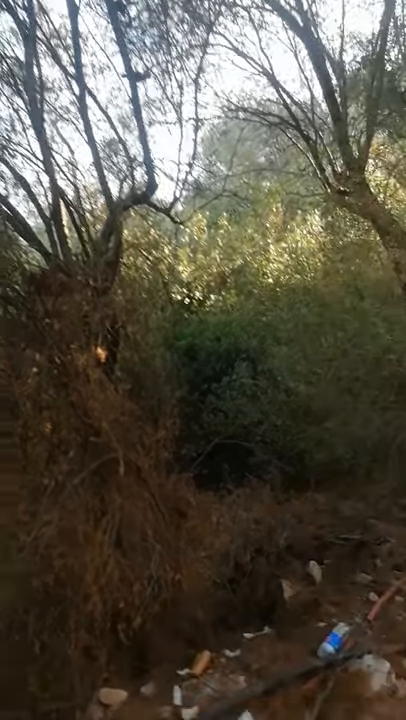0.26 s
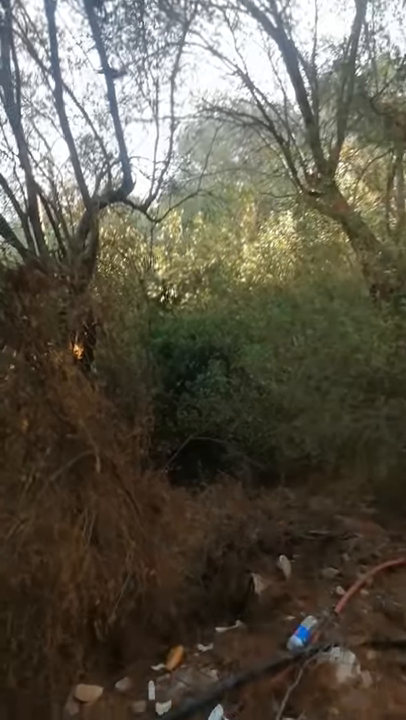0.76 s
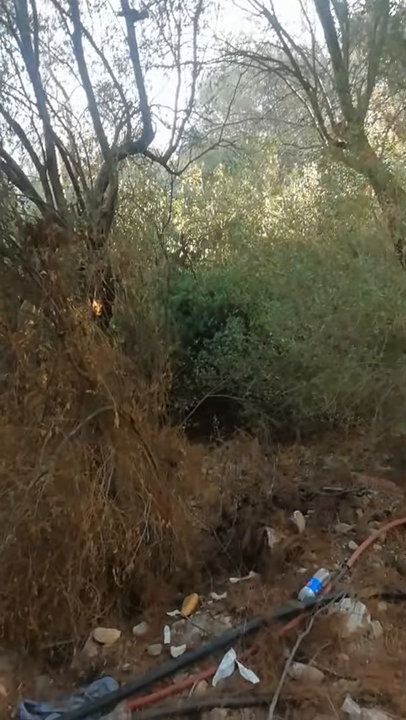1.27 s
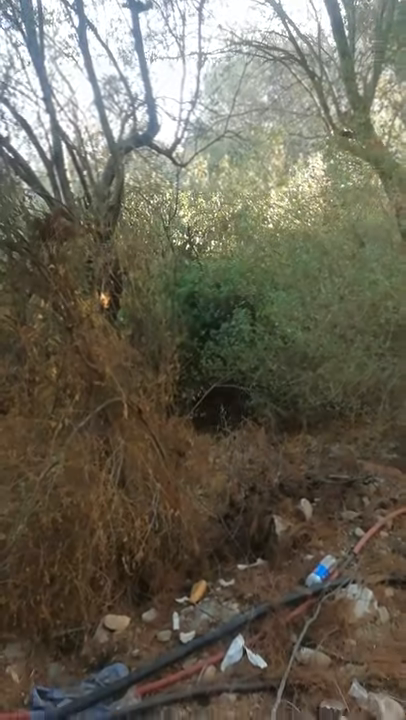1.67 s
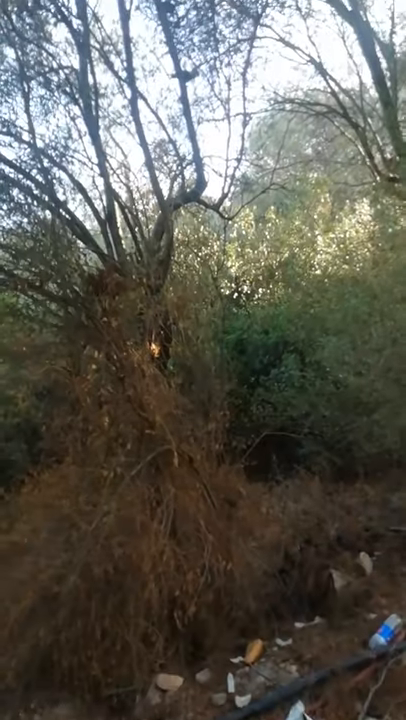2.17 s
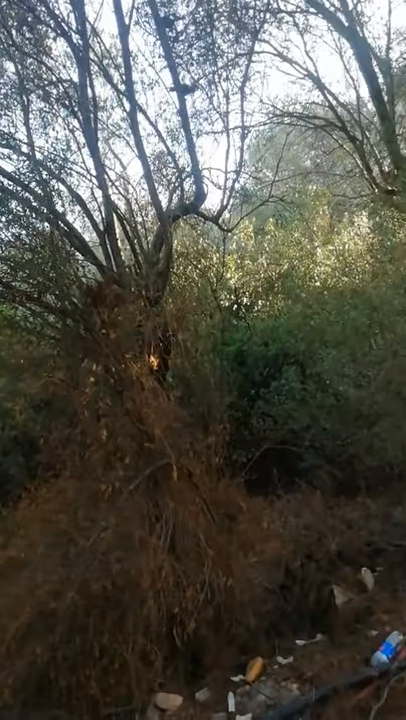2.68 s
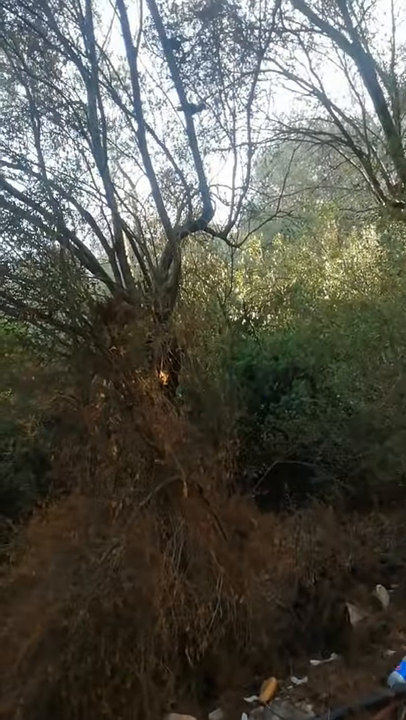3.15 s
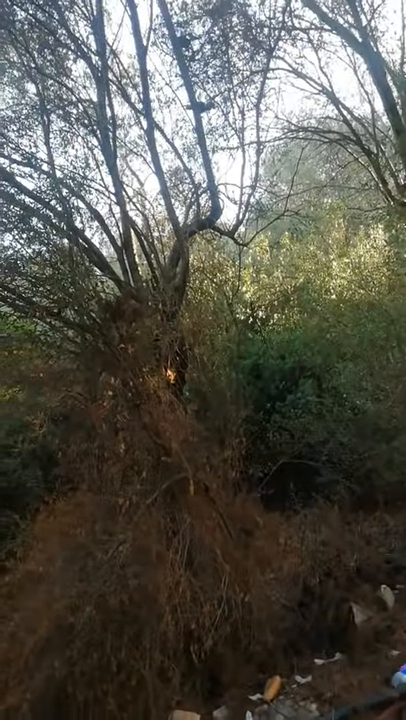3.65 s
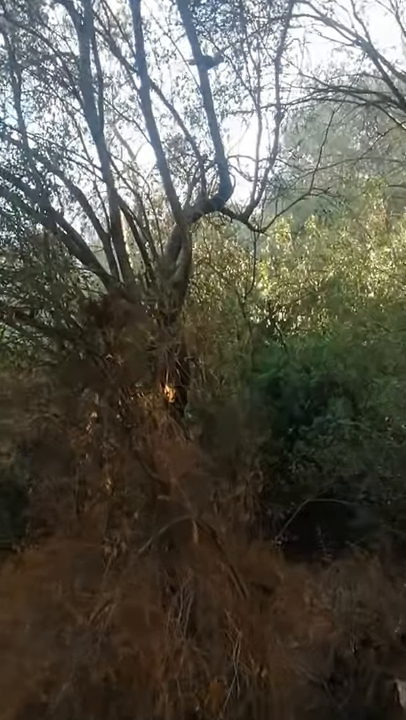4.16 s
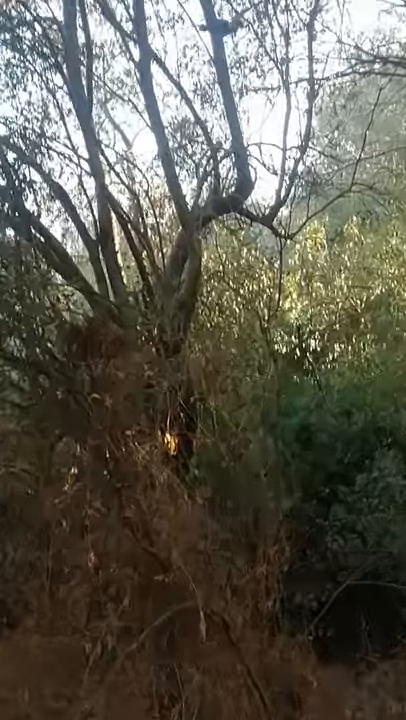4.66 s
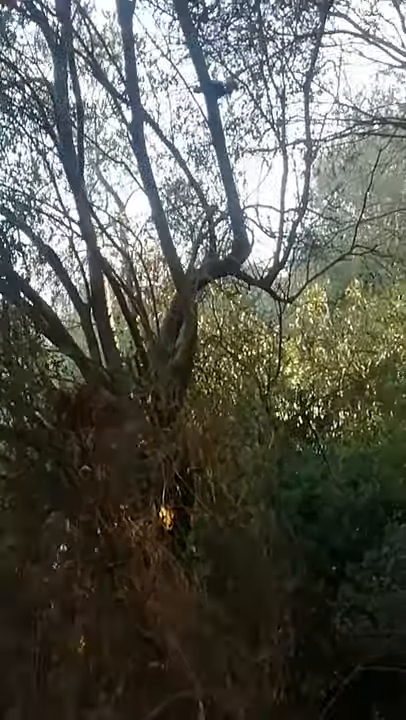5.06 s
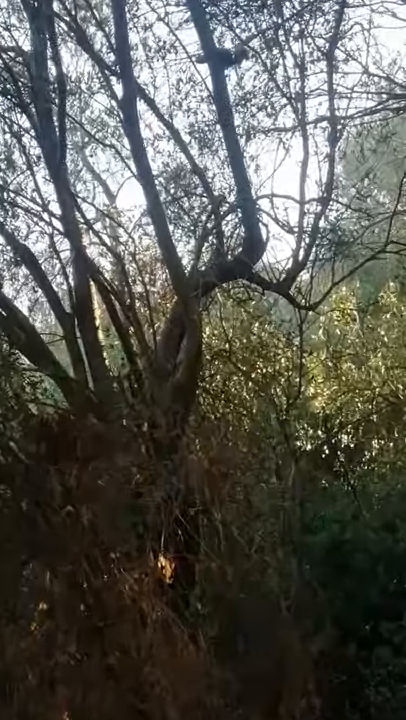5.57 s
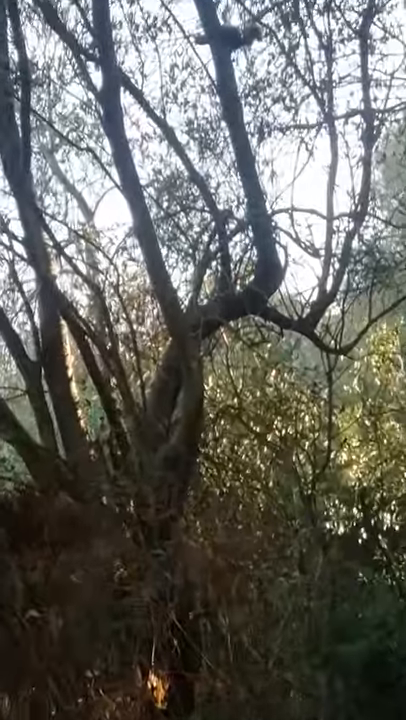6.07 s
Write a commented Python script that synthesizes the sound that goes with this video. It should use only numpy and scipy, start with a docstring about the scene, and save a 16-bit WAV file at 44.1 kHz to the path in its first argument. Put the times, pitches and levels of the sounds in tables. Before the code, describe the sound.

A squirrel scolds from a tree in three quick runs of raspy, squeaky chips, with early finger bumps and faint distant traffic.

```python
"""In the woods, a squirrel scolds from a tree in three quick runs. Most calls open with a hiss, rasp
upward and clear into an arched squeal: harmonics of a moving pitch, echoed by twigs and trunks.
One harsh call ends by jumping up into a clear squeal. A finger bumps, taps and rubs the hand-held
camera, whose right microphone port is muffled. Coloured noise makes the distant traffic and a
passing rush, and a wavering sine makes a far whine."""
import sys
import numpy as np
from scipy import signal
from scipy.fft import rfft, irfft, next_fast_len
from scipy.io import wavfile
from scipy.ndimage import map_coordinates

SR = 44100
rng = np.random.default_rng(int(sys.argv[2]) if len(sys.argv) > 2 else 0)


def wav_out(sig):
    """Save sig, one row per channel (or a flat mono array), as 16-bit PCM at SR to the path in sys.argv[1]."""
    wavfile.write(sys.argv[1], SR, np.round(np.clip(np.atleast_2d(sig).T, -1, 1) * 32767).astype(np.int16))


N = 279153
TIME = np.arange(N) / SR  # seconds

# The squirrel's calls; the row at 2.187 is the end of the harsh call before it, jumping up into a
# clear squeal with almost no hiss or rasp: voice_start_s, length_s, top_pitch_hz, rasp_db, squeal_db,
# doubling (0-1, how unequal alternate voice cycles are)
CALLS = [(0.388, 0.073, 2222, -36.5, -35, 0), (0.6, 0.044, 2275, -29.5, -34, 0),
         (0.785, 0.046, 2240, -32.5, -35, 0.1), (0.978, 0.039, 2194, -35.5, -38, 0.2),
         (2.119, 0.078, 2044, -33, -29.5, 0.95), (2.187, 0.0201, 2340, -58, -33, 0.1),
         (2.266, 0.036, 2375, -26.5, -30.5, 0.03), (2.415, 0.042, 2345, -28.5, -28.5, 0.08),
         (2.589, 0.04, 2222, -31.5, -35.5, 0.1), (2.775, 0.048, 2188, -33.5, -36, 0),
         (2.962, 0.038, 2208, -34.5, -37, 0), (3.168, 0.056, 2174, -42.5, -37.5, 0.13),
         (3.983, 0.064, 2292, -38, -31, 0.06), (4.19, 0.042, 2201, -29, -36, 0),
         (4.371, 0.042, 2190, -34.5, -37, 0.17), (4.548, 0.044, 2193, -33.5, -37, 0),
         (4.725, 0.038, 2178, -34.5, -37, 0.06), (4.918, 0.041, 2062, -41.5, -41, 0.07),
         (5.122, 0.043, 2170, -42, -37.5, 0.22), (5.318, 0.038, 2122, -39, -39, 0.2),
         (5.505, 0.035, 2124, -39, -40.5, 0.1), (5.689, 0.034, 2130, -38, -40, 0.04),
         (5.885, 0.042, 2040, -41, -39.5, 0), (6.079, 0.036, 2000, -43, -40.5, 0.15),
         (6.277, 0.046, 2058, -43, -39, 0.1)]
# Hisses without a voice: start_s, length_s, level_db
VOICELESS_HISSES = [(0.21, 0.034, -53), (1.215, 0.019, -55)]
# Colour of air through the teeth: frequency_hz, density_db (per Hz)
TEETH_COLOUR = [(1200, -36), (2600, -3.5), (5200, -18.5), (7600, 0), (9200, -2.5), (10500, -11.5),
                (12000, -8.5), (15500, -29)]
# Colour of the voice before its resonances: frequency_hz, level_db
FOLDS_COLOUR = [(600, -79), (1300, -2.5), (1800, -19.5), (2400, -3), (3050, -8.5), (3700, -6), (4800, -17),
                (5450, -14.5), (6100, -14), (6700, -12), (8100, -9.5), (9000, -15), (10500, -15.5),
                (12500, -24), (15500, -38)]
# Resonances of chest, throat and mouth: centre_hz, width_hz, boost_db
TRACT_PEAKS = [(2240, 350, -0.5), (4400, 370, 10.5), (7050, 1004, 19)]
# How slowly the echo of the woods dies: frequency_hz, time_to_fall_60_db_s
WOODS_DECAY = [(1000, 0.56), (4300, 0.34), (6800, 0.29), (9000, 0.29), (14000, 0.26)]
# Resonances of the camera body under a finger: centre_hz, width_hz, relative_level_db
CASE_PEAKS = [(516, 107, 32), (885, 160, 12)]
# Soft bumps: start_s, level_db, first_pitch_hz, last_pitch_hz, swell_s
BUMPS = [(0.151, -36.5, 60, 40, 0.0072), (0.2762, -22, 236, 48, 0.014), (3.512, -40, 190, 40, 0.009)]
# Taps: start_s, knock_db (before a shared lift), dull_push_share, left_tick_db, right_tick_db
TAPS = [(0.321, -68, 0, -33, -54), (0.3621, -38.5, 0.97, -41, -31), (3.5135, -36, 0.98, -58, -70)]
# A finger sliding over the case: start_s, length_s, level_db
RUBS = [(0.468, 0.037, -50.5), (0.582, 0.15, -50)]
# Colour of a finger's friction: frequency_hz, density_db (per Hz)
SKIN_COLOUR = [(200, -9), (600, 1.5), (1000, 2), (1500, -8), (3000, -11)]
# Colours of the far road's rumble, roar and tyre wash: frequency_hz, density_db (per Hz)
RUMBLE_COLOUR = [(15, -10.5), (35, -2.5), (52, 0.5), (70, -3.5), (84, -1.5), (102, -9.5), (160, -22.5),
                 (400, -66)]
ROAD_COLOUR = [(80, -16), (150, -4.5), (260, 2), (380, -4), (520, -10), (750, -8.5), (1500, -38)]
TYRE_COLOUR = [(400, -49), (750, 2), (1000, 6), (1500, 5), (2100, 1), (3000, -4.5), (5200, -11.5),
               (7800, -9.5), (10000, -29), (15000, -46)]
# Loudness of those three layers over time: time_s, level_db (before each layer's lift)
RUMBLE_LEVEL = [(0.0, -57), (0.44, -53), (1.16, -62.5), (2.01, -57), (2.96, -61), (3.47, -62), (4.14, -64),
                (4.67, -58), (5.15, -57), (5.87, -64.5), (6.15, -61.5), (6.33, -57)]
ROAD_LEVEL = [(0.0, -61.5), (0.42, -59), (1.89, -63.5), (2.55, -59.5), (3.05, -66.5), (4.76, -62.5),
              (5.18, -58.5), (5.45, -62), (6.33, -62.5)]
TYRE_LEVEL = [(0.0, -60), (0.6, -60.5), (0.92, -63.5), (1.45, -60.5), (1.64, -63.5), (2.48, -65),
              (3.37, -69.5), (4.8, -67), (5.09, -65), (6.33, -69)]
# Colour of the hollow rush of something passing: frequency_hz, density_db (per Hz)
RUSH_COLOUR = [(250, -28), (420, 6), (600, -2), (820, 7.5), (1300, -5.5), (2500, -28)]
# Swells of a far whine: start_s, length_s, level_db
WHINES = [(4.54, 1.3, -65.5), (4.71, 0.2, -58.5), (5.07, 0.087, -54.5)]
# What the muffled right port lets through: frequency_hz, gain_db
MUFFLE = [(200, 1.5), (380, -1.5), (700, -7.5), (1290, -12.5), (2380, -18.5), (4400, -23), (8100, -30),
          (15000, -29)]

RASP_SHARE = 0.4  # of a row's length, before it clears
EASY_DB, FORCED_DB = -48, -30  # rasp level of an effortless and of a fully forced call
# The opening hiss of a typical call; a stronger rasp has a louder, shorter hiss
TYPICAL_RASP_DB, HISS_DB, HISS_LEAD_S = -35, -47.5, 0.024
HISS_DB_PER_DB, LEAD_S_PER_DB = 0.6, 0.0009
# Pitch arch: how far below the top it starts and ends (shares), its bends (powers), last drop's time
CLIMB, FALL, CLIMB_BEND, FALL_BEND, FALL_S = 0.35, 0.085, 2.3, 2.3, 0.015
# A fully forced rasp: scatter of its cycles and share of air; depth and rate of its sputter
SCATTER, AIR, SPUTTER_DB, SPUTTER_HZ = 0.04, 0.54, 6, 401
# A squeal softer than SOFT_DB, or with doubled periods, is rounder: partials around LOW_HZ stand out
SOFT_DB, ROUND_DB_PER_DB, DOUBLED_ROUND_DB = -35.5, 2, 3.5
LOW_HZ, LOW_WIDTH_HZ = 2780, 630
# Something passing: nearest moment, half the time it stays near, levels of its rush and rumble
PASS_S, PASS_WIDTH_S, PASS_RUSH_DB, PASS_RUMBLE_DB = 5.18, 0.21, -54.5, -57
WHINE_HZ = 818
PORT_LAG = 26  # samples by which outdoor sound reaches the right port later
TOUCH_LEAD = 33  # samples by which a touch reaches the right port earlier
TOP_HZ = 15750  # nothing passes above this


def squirrel():
    """All the calls with their twig echoes, and two hisses that find no voice."""
    out = noise(TEETH_COLOUR) * spells(VOICELESS_HISSES, rise=0.0037, fall=0.013)
    for row in CALLS:
        start, sound = call(*row)
        add(out, start, twigs(sound, echo_db=-16.5))
    return out


def call(onset, length, top_hz, rasp_db, squeal_db, doubling):
    """One row: hiss, folds flapping as the pitch climbs, a clear arch; gives start time and sound."""
    size = SR // 6
    excess_db = rasp_db - TYPICAL_RASP_DB
    hiss_at = onset - HISS_LEAD_S + LEAD_S_PER_DB * excess_db
    squeal_at, end = onset + RASP_SHARE * length, onset + length
    t = hiss_at + (np.arange(size) - SR // 100) / SR
    colour = tract(squeal_db, doubling)
    pitch = top_hz * arch(t - onset, length)

    # the harder the call is forced, the more the cycles scatter and sputter and the more air escapes
    force = np.clip((rasp_db - EASY_DB) / (FORCED_DB - EASY_DB), 0.1, 1)
    scatter = SCATTER * force * (wobble(1805, size) + 0.886 * wobble(350.9, size))
    # the flapping folds favour the even harmonics
    flap = unit(voice(pitch * (1 + scatter), 0.56 * force, colour, odd=0.83))
    sputter = amp(SPUTTER_DB * force * np.tanh(wobble(SPUTTER_HZ, size)))
    rasp = (flap + AIR * force * noise(colour, size)) * sputter
    rasp = rasp / np.std(rasp[(t > onset) & (t < squeal_at)])

    fast_jitter = (0.005 + 0.007 * force) * wobble(2000, size)
    slow_jitter = (0.005 + 0.010 * force) * wobble(280, size)
    squeal = voice(pitch * (1 + fast_jitter + slow_jitter), doubling, colour)
    squeal = squeal / np.std(squeal[(t > squeal_at) & (t < end)])
    squeal = squeal * amp(1.78 * wobble(156.7, size))
    squeal = squeal + 0.33 * force * noise(colour, size)

    hiss = noise(TEETH_COLOUR, size) * amp(2.5 * wobble(300, size))
    hiss = hiss * amp(HISS_DB + HISS_DB_PER_DB * excess_db)
    # the three parts overlap a little as one hands over to the next
    sound = hiss * gate(t, hiss_at + 0.0047, onset + 0.014, rise=0.0051, fall=0.011)
    sound = sound + amp(rasp_db) * rasp * gate(t, onset + 0.0017, squeal_at, rise=0.0037, fall=0.003)
    sound = sound + amp(squeal_db) * squeal * gate(t, squeal_at, end - 0.001, rise=0.0061, fall=0.0034)
    return t[0], sound


def voice(pitch, doubling, colour, odd=1):
    """Harmonics through the tract; unequal alternate cycles add lines halfway between them."""
    k = np.arange(1, 15)[:, None] / 2  # harmonic numbers in half steps
    phase = 2 * np.pi * np.cumsum(pitch) / SR
    share = np.where(k % 1, doubling, np.where(k % 2, odd, 1))
    audible = k * pitch < SR / 2
    weight = amp(along(colour, k * pitch)) * share * audible
    first_phase = rng.uniform(0, 2 * np.pi, k.shape)
    return np.sum(weight * np.sin(k * phase + first_phase), axis=0)


def arch(age, length):
    """Pitch as a share of its top: a fast climb, a round crest and a short drop as the call runs out."""
    crest = max(length - FALL_S, length / 2)
    before = np.clip((crest - age) / crest, 0, 1.05)
    after = np.maximum((age - crest) / (length - crest), 0)
    return 1 - CLIMB * before ** CLIMB_BEND - np.minimum(FALL * after ** FALL_BEND, 0.35)


def tract(squeal_db, doubling):
    """(Hz, dB) colour of one call: the folds' slope, three resonances and a broad lift of low partials."""
    hz = np.geomspace(500, 16000, num=120)
    round_db = ROUND_DB_PER_DB * max(SOFT_DB - squeal_db, 0) + DOUBLED_ROUND_DB * doubling
    peaks = [*TRACT_PEAKS, (LOW_HZ, LOW_WIDTH_HZ, round_db)]
    boost_db = sum(db * np.exp(-0.5 * ((hz - centre) / width) ** 2) for centre, width, db in peaks)
    return np.transpose([hz, along(FOLDS_COLOUR, hz) + boost_db])


def twigs(x, echo_db):
    """Nearby branches send back weak copies that strengthen some partials and weaken others."""
    delay = np.round(rng.uniform(0.0004, 0.014, size=8) * SR).astype(int)
    echoes = np.bincount(delay, amp(echo_db) * rng.choice([-1, 1], size=8))
    echoes[0] = 1  # the direct sound
    return signal.fftconvolve(x, echoes / np.linalg.norm(echoes))


def woods(x, wet_db):
    """Trunks and leaves scatter a thin tail, different at each port, its treble dying fastest."""
    hz, t, z = signal.stft(rng.standard_normal((2, SR // 2)), SR, nperseg=256)
    decay = amp(-60 * t / along(WOODS_DECAY, hz)[:, None])
    tail = signal.istft(z * decay, SR, nperseg=256)[1]
    tail = tail * (1 - np.exp(-np.arange(tail.shape[1]) / SR / 0.0041))  # the tail builds up softly
    tail = tail / np.linalg.norm(tail[0])
    return x + amp(wet_db) * signal.fftconvolve(x[None], tail, axes=1)[:, :N]


def handling():
    """Soft bumps sink in pitch as the grip settles; taps and a sliding finger sound the case."""
    low, knocks = np.zeros((2, N))
    ticks = np.zeros((2, N))
    t = np.arange(SR // 5) / SR
    for s, db, first_hz, last_hz, swell in BUMPS:
        hz = last_hz + (first_hz - last_hz) * np.exp(-t / 0.0047)
        swelling = (t / swell * np.exp(1 - t / swell)) ** 1.47
        add(low, s, amp(db) * swelling * np.sin(2 * np.pi * np.cumsum(hz) / SR))

    ring = case(1. * (t == 0))  # the case answering a single click
    u = t / 0.0014
    push = (1 - u) * np.exp(-u)
    tick_colour = [(500, 9), (3000, 0), (6000, 7), (15000, -8)]  # (Hz, dB per Hz)
    for s, knock_db, dull, *tick_db in TAPS:
        add(knocks, s, amp(knock_db + 4.5) * (ring / ring.max() + dull * push))
        for port, db in zip(ticks, tick_db):
            add(port, s, amp(db) * np.exp(-t / 0.00052) * noise(tick_colour, len(t)))

    rub = spells(RUBS, rise=0.014, fall=0.013) * amp(2.8 * wobble(90.4))
    rub = rub * unit(case(noise(SKIN_COLOUR)))
    # a soft fingertip passes little treble
    soft = signal.butter(8, 960, fs=SR, output="sos")
    body = signal.sosfilt(soft, knocks) + rub
    return low + body * amp([[-2], [2]]) + ticks  # the body sounds are stronger on the right


def case(x):
    """The camera body rings briefly at its own resonances."""
    def response(f):
        return sum(amp(db) * 1j * f * w / (c * c - f * f + 1j * f * w) for c, w, db in CASE_PEAKS)
    return filtered(x, response)


def passing():
    """A distant rush and rumble swell and fade as something passes, with a wavering whine around them."""
    near = 1 / (1 + ((TIME - PASS_S) / PASS_WIDTH_S) ** 2)
    rush = amp(PASS_RUSH_DB) * spread(RUSH_COLOUR, diffuse=0.84)
    rumble = amp(PASS_RUMBLE_DB) * spread(RUMBLE_COLOUR, diffuse=0.045)
    whine = tone(WHINE_HZ + 12 * wobble(70)) * amp(2.4 * wobble(25))
    return near * (rush + rumble) + spells(WHINES, rise=0.015, fall=0.026) * whine


def traffic():
    """A far road: noise for rumble, road roar and tyre wash, with a wavering low sine as engine note."""
    engine = amp(-5.5 + 1.3 * wobble(3.5)) * tone(80.5 + 1.61 * wobble(5.5))
    rumble = spread(RUMBLE_COLOUR, diffuse=0.03) + engine
    rumble = amp(curves(RUMBLE_LEVEL)[0] + 1.6) * rumble
    road = amp(curves(ROAD_LEVEL)[0] + 1.0) * spread(ROAD_COLOUR, diffuse=0.7)
    flutter_db = 0.7 * wobble(12)
    tyres = amp(curves(TYRE_LEVEL)[0] + 7.6 + flutter_db) * spread(TYRE_COLOUR, diffuse=0.59)
    return rumble + road + tyres


def spread(spectrum, diffuse):
    """Noise shared by both ports plus a part that differs at each."""
    return unit(noise(spectrum) + diffuse * np.array([noise(spectrum), noise(spectrum)]))


def noise(spectrum, size=N):
    """Coloured noise of rms 1."""
    return unit(filtered(rng.standard_normal(size), lambda hz: amp(along(spectrum, hz))))


def tone(hz):
    """A sine of rms 1 on a moving pitch."""
    return np.sqrt(2) * np.sin(2 * np.pi * np.cumsum(hz) / SR)


def wobble(rate, size=N):
    """A smooth random curve shaped by rate random points a second."""
    return map_coordinates(rng.standard_normal(size // 8 + 4), [np.arange(size) * rate / SR], mode="wrap")


def gate(t, start, end, rise, fall):
    """A loudness curve that opens smoothly at start and closes at end (all in seconds)."""
    return (1 + np.tanh((t - start) / rise)) * (1 - np.tanh((t - end) / fall)) / 4


def spells(rows, rise, fall):
    """The loudness curve of (start s, length s, dB) events."""
    return sum(amp(db) * gate(TIME, s, s + length, rise, fall) for s, length, db in rows)


def curves(rows):
    """One value per sample for each column after the time."""
    s, *cols = np.transpose(rows)
    return [np.interp(TIME, s, c) for c in cols]


def along(points, hz):
    """Read between (Hz, value) points on a log frequency axis."""
    f, v = np.transpose(points)
    return np.interp(np.log(hz + 1), np.log(f + 1), v)


def filtered(x, response):
    """Multiply the spectrum of x by a response that depends on frequency."""
    n = x.shape[-1]
    m = next_fast_len(n + 4096)
    return irfft(rfft(x, m) * response(np.fft.rfftfreq(m, 1 / SR)), m)[..., :n]


def delayed(x, samples):
    """x later by some samples."""
    return filtered(x, lambda hz: np.exp(-2j * np.pi * hz * samples / SR))


def add(track, s, sound):
    """Mix a sound into a track at s seconds."""
    part = track[max(round(s * SR), 0):][:len(sound)]
    part += sound[:len(part)]


def amp(db):
    """Decibels to gain."""
    return 10 ** (np.asarray(db) / 20)


def unit(x):
    """Scale to rms 1."""
    return x / np.sqrt(np.mean(x ** 2) + 1e-20)


def scene():
    """The right port hears the outdoors dully and late, but lies nearer to the fingers."""
    left, right = woods(squirrel(), wet_db=-11.5) + traffic() + passing()
    right = filtered(right, lambda hz: amp(along(MUFFLE, hz)))
    right = delayed(right, PORT_LAG)
    touch_left, touch_right = handling()
    return np.array([left + delayed(touch_left, TOUCH_LEAD), right + touch_right])


def record(dry):
    """Faint microphone hiss, separate at each port, and the camera's band limit."""
    # frequency in Hz, dB per Hz
    colour = [(100, -14), (1000, 0.5), (2500, 2), (7500, -1.0), (10000, -6), (15500, -8.0)]
    hiss = amp(-69.5) * np.array([noise(colour), noise(colour)])
    return filtered(dry + hiss, lambda hz: hz < TOP_HZ)


dry = scene()
out = record(dry)
wav_out(out)
```